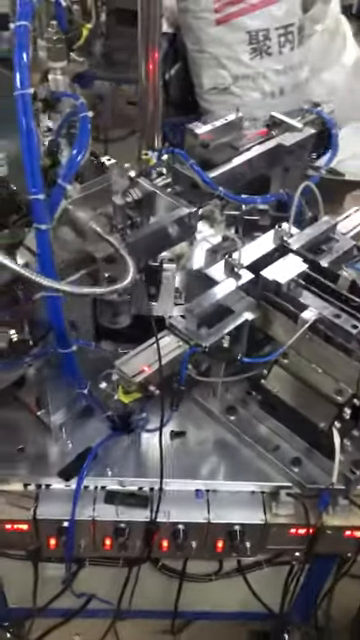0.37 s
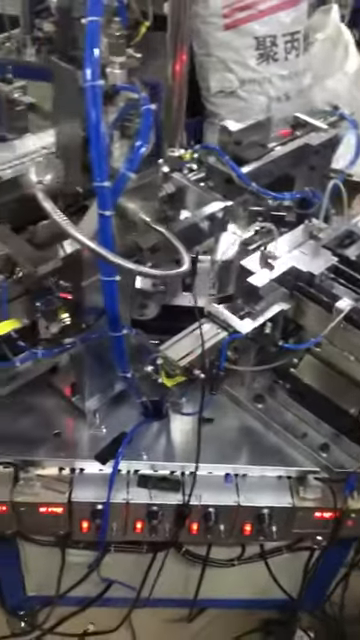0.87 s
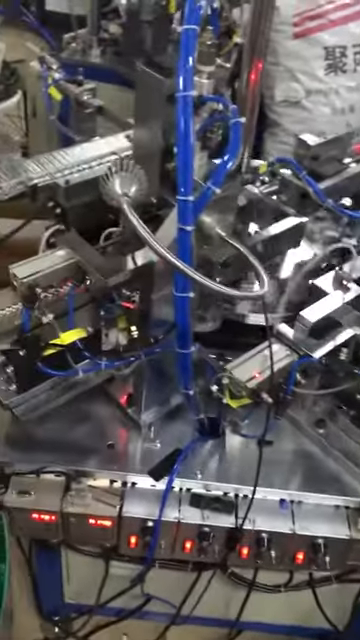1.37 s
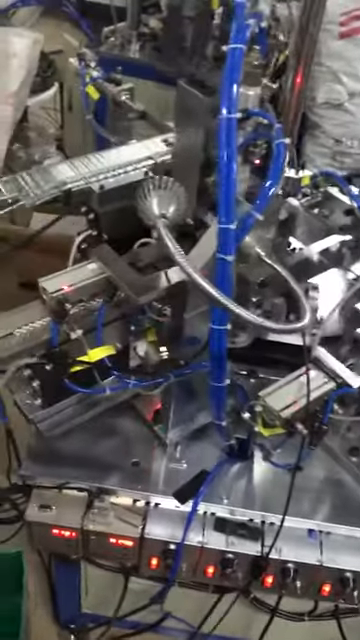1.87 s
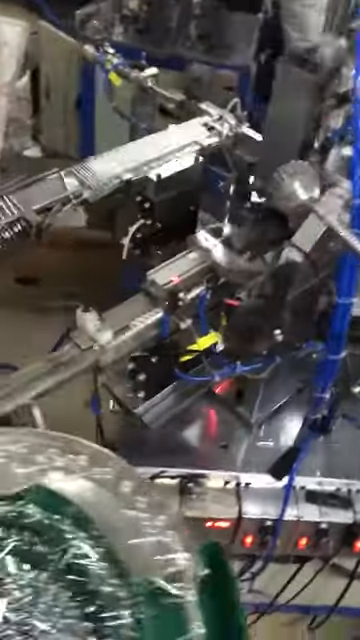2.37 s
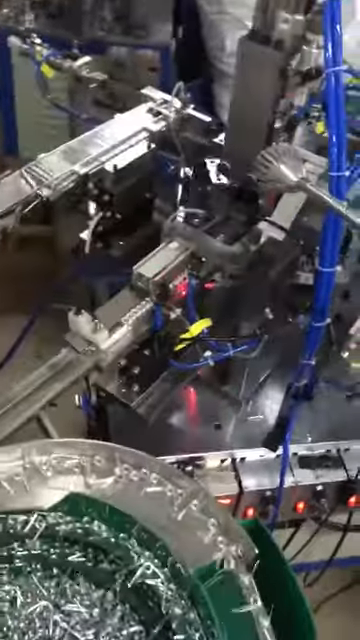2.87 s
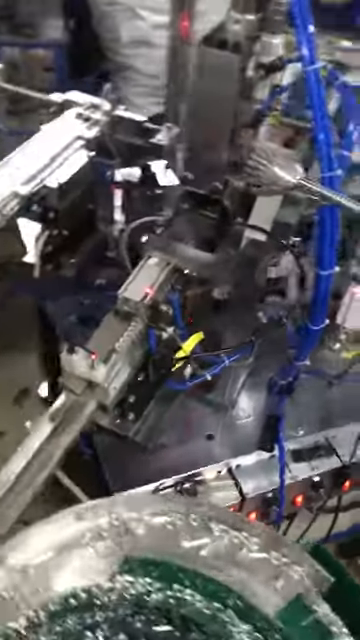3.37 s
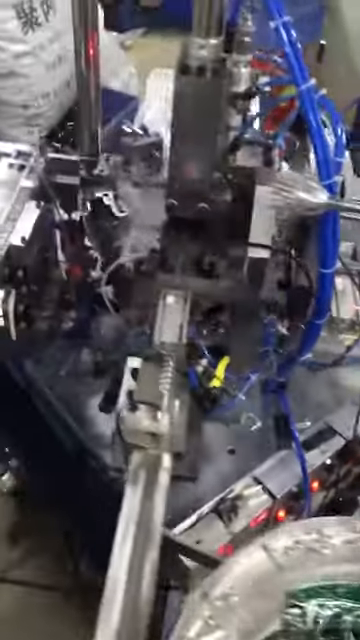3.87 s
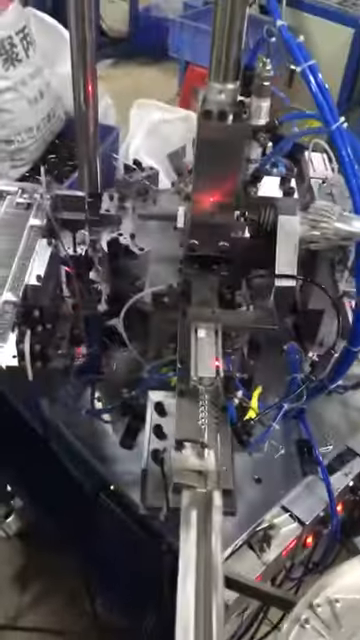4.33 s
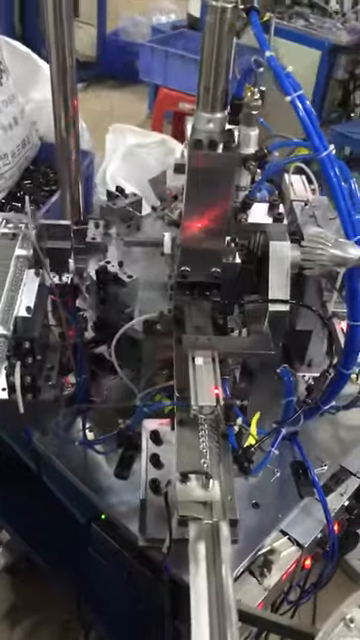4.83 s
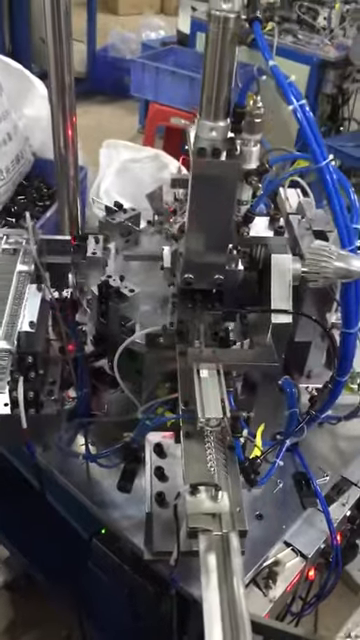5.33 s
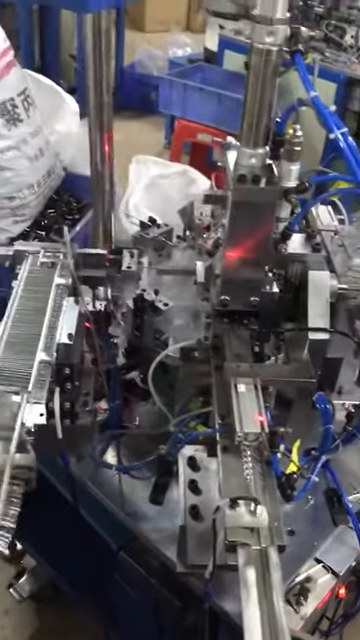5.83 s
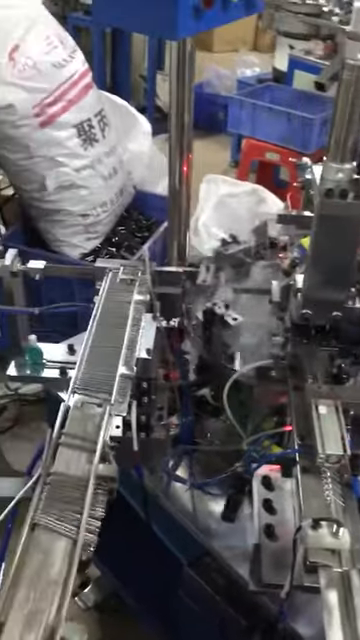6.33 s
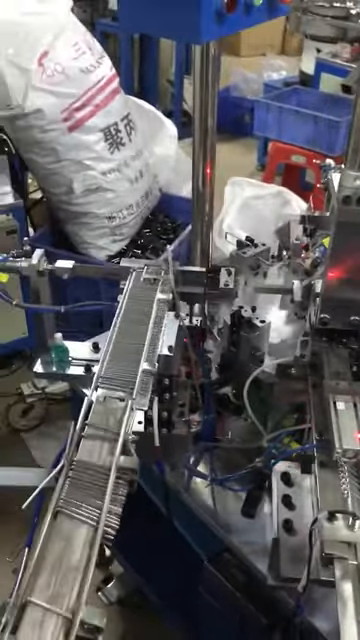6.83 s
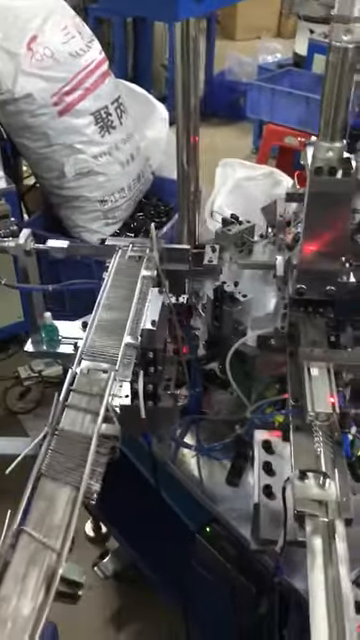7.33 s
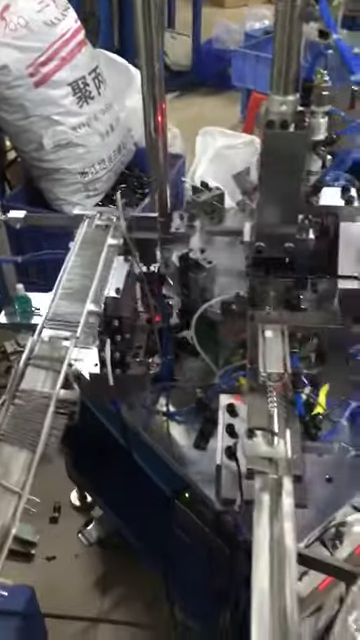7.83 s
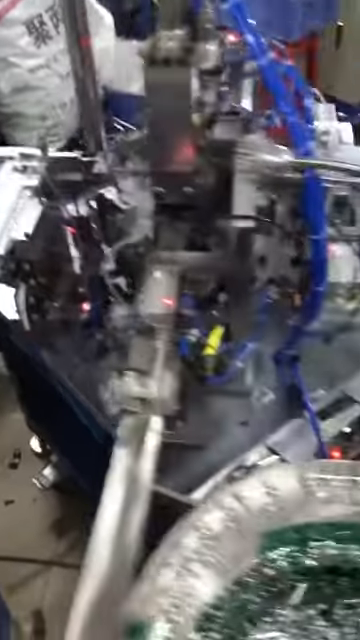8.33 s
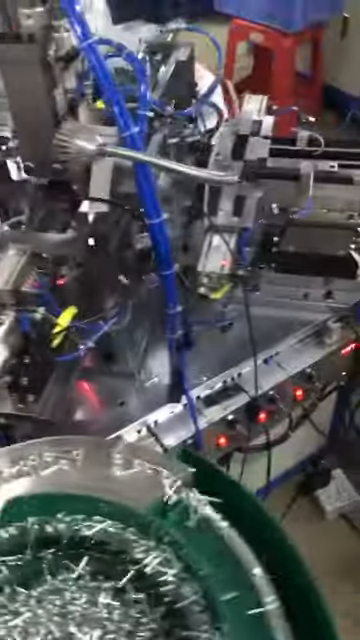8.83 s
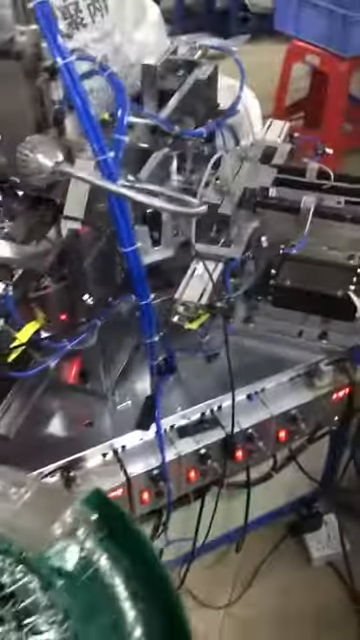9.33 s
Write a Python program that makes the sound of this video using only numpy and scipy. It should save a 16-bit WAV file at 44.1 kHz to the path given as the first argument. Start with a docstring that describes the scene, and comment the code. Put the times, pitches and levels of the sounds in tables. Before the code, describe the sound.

Thousands of small metal pins hiss brightly on a vibrating assembly machine, swelling as a feeder bowl draws near, with low hum and soft periodic knocks.

```python
"""A bright, ringing hiss comes first: mains magnets shake thousands of metal pins on the rails of a pneumatic
assembly machine, made as dense noise heard directly and through the modes of the metal. A phone pans past:
a vibrating bowl feeder draws near and recedes, and the magnets hum in sines shaped by standing waves. Decaying
modes knock about once a machine cycle, faint narrow-noise tinkles swell in the hiss, and low coloured noise
is the workshop."""
import sys
import numpy as np
from scipy import signal
from scipy.fft import rfft, irfft, next_fast_len
from scipy.io import wavfile
from scipy.ndimage import uniform_filter1d

SR = 44100
rng = np.random.default_rng(int(sys.argv[2]) if len(sys.argv) > 2 else 0)


def nominal_scale(level):
    """Amplitude ratio for a level in decibels (scalar or array-like)."""
    x = np.asarray(level, float) / 20
    return 10 ** x


def unload_wav(signal):
    """Save mono or channel-first audio to the path in sys.argv[1] as 16-bit WAV at rate SR, clipped to [-1, 1]."""
    wavfile.write(
        sys.argv[1],
        SR,
        np.round(np.clip(np.atleast_2d(signal).T, -1, 1) * 32767).astype(np.int16),
    )


N = 427329
TIME = np.arange(N) / SR
MAINS_HZ = 50.035


def level(x, db):
    """Set the rms level."""
    return x * nominal_scale(db) / np.sqrt(np.mean(x ** 2))


def colour(x, points):
    """Shape a spectrum through (Hz, dB) points, interpolated over log frequency."""
    size = next_fast_len(len(x))
    hz, db = np.transpose(points)
    axis = np.log(np.arange(size // 2 + 1) * SR / size + 1)
    gain = nominal_scale(np.interp(axis, np.log(hz), db, left=-90))
    return irfft(rfft(x, size) * gain, size)[:len(x)]


def ring(x, hz, width_hz):
    """One resonance, gain 1 at the centre."""
    return signal.lfilter(*signal.iirpeak(hz, hz / width_hz, fs=SR), x)


def walk(rate):
    """Random levels held 1 / rate s and slewed twice; spread near 1."""
    hold = int(SR / rate)
    steps = np.repeat(rng.standard_normal(N // hold + 1), hold)
    return 1.37 * uniform_filter1d(uniform_filter1d(steps, hold), hold)[:N]


def along(curve):
    """A (s, value) curve at every sample."""
    return np.interp(TIME, *np.transpose(curve))


def presence(start, end):
    """Gain in dB of a part: stronger from start to end; if these are reversed, weakest between them."""
    weak_db, turn_s = -6.5, .3
    rise = np.tanh((TIME - start) / turn_s)
    fall = np.tanh((TIME - end) / turn_s)
    return weak_db * (1 - (rise - fall) / 2)


def patchy(x, spread_db, width_hz, hold_s):
    """Let every narrow band flicker alone: a slowly or quickly shifting, watery texture."""
    _, _, z = signal.stft(x, nperseg=1024)
    field = rng.standard_normal(z.shape)
    field = uniform_filter1d(field, max(1, round(width_hz * 1024 / SR)), axis=0)
    field = uniform_filter1d(field, max(1, round(hold_s * SR / 512)), axis=1)
    flickering = z * nominal_scale(spread_db * field / field.std())
    return signal.istft(flickering, nperseg=1024)[1][:N]


def shop():
    """Low rumble of the other machines: coloured noise whose bands flicker slowly."""
    # spectrum of the rumble, relative: hz, density_db (per Hz)
    rumble_tone = [(12, -50), (20, -33), (49, -6), (97, -7.5), (120, -11), (147, -11), (165, -13),
                   (468, -17), (813, -18.5), (930, -12), (1100, -16.5), (1430, -48), (2420, -120)]
    rumble = colour(rng.standard_normal(N), rumble_tone)
    return level(patchy(rumble, spread_db=2.5, width_hz=50., hold_s=.7), -62.5)


def hum():
    """Magnet hum at mains multiples, wavering slightly; the phone walks through its standing waves."""
    # hum as standing waves in the room: mains_multiple, crest_level_db, crest_place_m
    standing_waves = [(1, -53.5, -0.73), (2, -58.5, 0.71)]
    # weak upper hum of single magnets: mains_multiple, level_db, stronger_from_s, stronger_until_s
    magnet_buzz = [(3, -75, 2.5, 12), (4, -72.5, -3, 2.3)]
    # where the phone stands along its walk past the machine: time_s, place_m
    phone_place = [(0, 0.14), (.6, 0.39), (2, 0.53), (3, 0.7), (4, 0.81), (6, 0.95), (7.2, 0.97), (8, .66),
                   (9, .62), (9.7, 0.45)]
    node_db = -20  # what is left of a standing wave at its node
    place = along(phone_place)
    partials = []
    for multiple, db, crest in standing_waves:
        wave = np.cos(2 * np.pi * multiple * MAINS_HZ / 343 * (place - crest))  # sound travels at 343 m/s
        partials.append((multiple, nominal_scale(db) * np.hypot(wave, nominal_scale(node_db))))
    for multiple, db, start, end in magnet_buzz:
        partials.append((multiple, nominal_scale(db + presence(start, end))))
    out = np.zeros(N)
    for multiple, size in partials:
        waver = nominal_scale(0.42 * walk(6))
        tone = np.sin(2 * np.pi * (multiple * MAINS_HZ * TIME + rng.random()))
        out += np.sqrt(2) * size * waver * tone  # sqrt(2): levels are rms
    return out


def struck(modes, t, rise_s):
    """A struck part: decaying sine modes behind a short rise."""
    ringing = sum(nominal_scale(db - 60 * t / t60) * np.sin(2 * np.pi * hz * t) for hz, db, t60 in modes)
    return ringing * (1 - np.exp(-t / rise_s))


def knocks():
    """Slides thump the frame at their stops; a ram rings a plate and leaves a short noise clack."""
    # what a thump rings: mode_hz, relative_level_db, t60_s
    frame_modes = [(75, -4, 0.26), (222.3, -9, .5), (243.3, -0.5, 0.25), (290, -7, 0.17)]
    # what the ram rings: mode_hz, relative_level_db, t60_s
    plate_modes = [(955, -8.5, 0.69), (968, -9, 0.12), (1018, -6, .1)]
    # slides reach their stops: start_s, gain_db
    thumps = [(2.127, -57), (2.191, -53.5), (3.505, -56), (4.352, -64), (4.745, -54), (5.761, -59.5),
              (6.05, -63.5), (7.197, -57.5), (7.364, -64), (8.074, -61.5), (8.42, -63), (8.49, -63)]
    # the ram strikes about once a machine cycle: start_s, plate_gain_db, clack_level_db (rms before decay)
    ram_strikes = [(2.127, -70, -51), (3.505, -46, -65), (3.61, -56, -70), (4.775, -45, -66),
                   (6.05, -51, -66), (7.364, -46.5, -56), (8.42, -54, -60)]
    t = TIME[:SR // 2]
    thud = struck(frame_modes, t, rise_s=.006)
    plate = struck(plate_modes, t, rise_s=.003)
    out = np.zeros(N + len(t))
    for start, db in thumps:
        out[int(start * SR):][:len(t)] += nominal_scale(db) * thud
    for start, plate_db, clack_db in ram_strikes:
        noise = ring(rng.standard_normal(len(t)), 1200.0, 1800.0)
        clack = level(noise, clack_db) * nominal_scale(-60 * t / 0.24)
        out[int(start * SR):][:len(t)] += nominal_scale(plate_db) * plate + clack
    return out[:N]


def tinkles():
    """Short swells of narrow noise at chosen mode pitches: brief faint tinkles within the hiss."""
    # centre_s, length_s (between the 1/e points), pitch_hz, peak_level_db (rms)
    swells = [(3.46, .12, 6620, -58), (3.8, .15, 6070, -60), (4.22, .08, 6070, -60), (5.15, .1, 7340, -59),
              (5.6, .15, 7340, -58), (8.08, .18, 7340, -55), (6.25, .2, 3940, -60), (6.7, .12, 2470, -64),
              (9.62, .08, 1490, -63), (9.63, .08, 1190, -63)]
    out = np.zeros(N)
    for centre, length, hz, db in swells:
        tone = level(ring(rng.standard_normal(N), hz, 45.), db)
        out += tone * np.exp(-((TIME - centre) / (length / 2)) ** 4)
    return out


def pins(throb, strokes_hz):
    """Impacts so dense that they merge into noise, a little stronger on each stroke of the magnet."""
    return rng.standard_normal(N) * (1 + throb * np.cos(2 * np.pi * strokes_hz * TIME))


def feeder(tone, modes, rattle_db, ring_db, strokes_hz):
    """Pin impacts heard directly and through the modes of the metal, each mode swelling on its own."""
    hits = pins(0.035, strokes_hz)
    slow_flicker = patchy(colour(hits, tone), spread_db=1.1, width_hz=90., hold_s=.5)
    flicker = patchy(slow_flicker, spread_db=1.23, width_hz=220., hold_s=.035)
    rattle = flicker * nominal_scale(0.19 * walk(9))
    rings = np.zeros(N)
    for hz, width, db, start, end in modes:
        swell_db = 2.3 * walk(16) + 0.74 * walk(4)
        # two wider resonances in series narrow each other
        mode = ring(ring(hits, hz, 1.9 * width), hz, 1.9 * width)
        rings += nominal_scale(db + presence(start, end) + swell_db) * mode
    return nominal_scale(rattle_db) * level(rattle, 0) + nominal_scale(ring_db) * level(rings, 0)


def bowl_feeder():
    """The bowl is shaken at twice the mains; its level follows the distance to its outlet."""
    # colour of the rattle, relative: hz, density_db (per Hz)
    bowl_tone = [(1200, -15.5), (2000, -16), (3000, -7.5), (3900, -4), (5000, -1), (5800, -16), (7000, 0),
                 (8000, -0.5), (9300, -3), (10700, -2.5), (11300, 1), (12500, 5), (15000, -8)]
    # ringing metal: stronger from the first time to the second; if reversed, weakest between them: mode_hz,
    # width_hz (two resonances in series, each 1.9 times as wide), relative_level_db, first_s, second_s
    bowl_modes = [(2486, 35, -6, 5.57, 7.8), (3590, 47, -10, 5, 9.2), (3927, 35, -2.5, 5.2, 7.8),
                  (4065, 59, -6, 6, 8.9), (4235, 43, -6, 4.4, 5.8), (4338, 28, 3.5, 8.3, 8.4),
                  (5305, 99, -11.5, 3.8, 8.2), (6060, 110, -7.5, 3.2, 4.7), (6870, 110, -8, 11, 12),
                  (7305, 58, -5.5, 2.2, 9), (8440, 60, -3, 4, 6.2), (8520, 79, -5.5, 9, 11),
                  (9550, 39, -10.5, 2.8, 11), (11250, 41, -0.5, 2.7, 7.5), (12660, 84, -1, 4.3, 6.2),
                  (13100, 100, -7.5, 5.8, 7.7)]
    # distance to the outlet: time_s, distance_m
    outlet_distance = [(0, 3.1), (1, 3.2), (3.1, 2.3), (3.6, 1.18), (4.3, 0.99), (5.5, 1), (8.8, 0.97),
                       (9.1, 1.44), (9.7, 1.4)]
    rattle_db, ring_db = -42.5, -51.5  # at 1 m
    ring_beam = 1.2  # the ringing falls off faster than the rattle, as a power of distance
    far_db = -20 * np.log10(np.maximum(along(outlet_distance), .1))
    return feeder(bowl_tone, bowl_modes, rattle_db + far_db, ring_db + ring_beam * far_db, 2 * MAINS_HZ)


def pin_rails():
    """The rails are shaken at the mains frequency and hiss evenly all along the walk."""
    # colour of the rattle, relative: hz, density_db (per Hz)
    rail_tone = [(600, -14), (850, -11), (1150, -4), (1600, -5), (1800, -8), (2300, -9.5), (2600, -2.5),
                 (4000, 0.5), (4700, -3), (5400, 0.5), (7400, 0), (7700, -8.5), (9700, -2), (10600, -5.5),
                 (11400, -3), (12200, 0.5), (15000, -3.5)]
    # ringing metal: stronger from the first time to the second; if reversed, weakest between them: mode_hz,
    # width_hz (two resonances in series, each 1.9 times as wide), relative_level_db, first_s, second_s
    rail_modes = [(276.5, 54, -11, 5, 8.45), (567, 26, -11.5, -3, 1), (539, 45, -19, 4, 8.4),
                  (936, 38, -7.5, 2, 9.3), (1180, 26, -9, 6.5, 12), (1332, 40, -7, -0.5, 2.4),
                  (1484, 31, -6, -1, 2.6), (1565, 30, -7.5, 6, 11), (2275, 52, -14.5, 2, 14),
                  (2653, 60, -6, -1, 8.5), (2870, 36, -9, 3, 1.6), (3404, 67, 0.5, 2.2, 4.1),
                  (4010, 42, -0.5, 5.5, 4.8), (5114, 75, -1, -0.5, 3.3), (5010, 81, -10, 8, 13),
                  (5325, 34, -2.5, -3, 3.9), (6560, 240, -8, 7.5, 12), (6690, 66, -11, 2.5, 23),
                  (9700, 55, -15, 1, 11), (11580, 180, -5.5, -2, 2.1), (11720, 84, -2, 0.5, 0.51)]
    return feeder(rail_tone, rail_modes, rattle_db=-43.5, ring_db=-55.5, strokes_hz=MAINS_HZ)


def scene():
    """One microphone, the same on both channels."""
    mix = shop() + hum() + knocks() + tinkles() + bowl_feeder() + pin_rails()
    return np.tile(mix, (2, 1))


def drop_masked(x):
    """The phone keeps little of narrow treble bands that fall well under their louder neighbours."""
    under_db, left_db = -4.8, -24
    band_hz, reach_hz, from_hz = 170., 3200., 3000.
    hz, _, z = signal.stft(x, SR, nperseg=2048, noverlap=1024)
    power = np.abs(z) ** 2
    band = uniform_filter1d(power, round(band_hz / hz[1]), axis=-2)
    around = uniform_filter1d(power, round(reach_hz / hz[1]), axis=-2)
    masked = (band < around * nominal_scale(2 * under_db)) & (hz[:, None] > from_hz)  # doubled dB: these are powers
    thinned = z * np.where(masked, nominal_scale(left_db), 1)
    return signal.istft(thinned, SR, nperseg=2048, noverlap=1024)[1][..., :N]


def band_limit(x):
    """A steep low-pass at the top of the band."""
    return signal.sosfilt(signal.butter(12, 14280, fs=SR, output="sos"), x)


def record(dry):
    """The phone thins out masked bands and cuts the top steeply."""
    top_cut = signal.ellip(15, .2, 70, 13095, fs=SR, output="sos")  # ripple dB, stop dB, edge Hz
    mix = signal.sosfilt(top_cut, drop_masked(dry))
    return band_limit(mix)


dry = scene()
out = record(dry)
unload_wav(out)
```